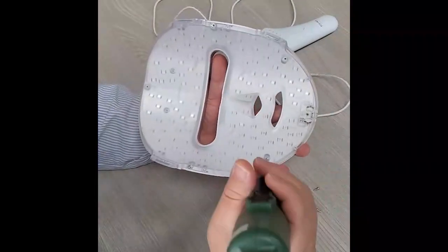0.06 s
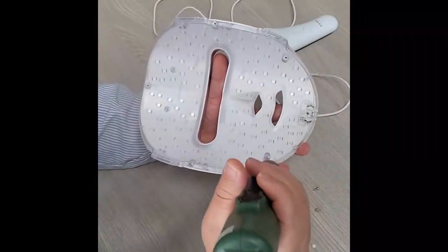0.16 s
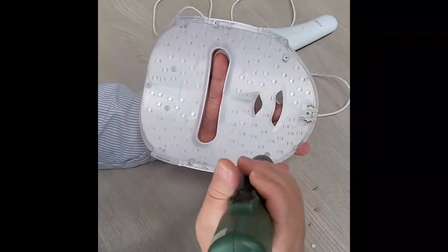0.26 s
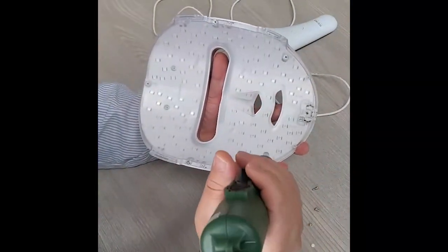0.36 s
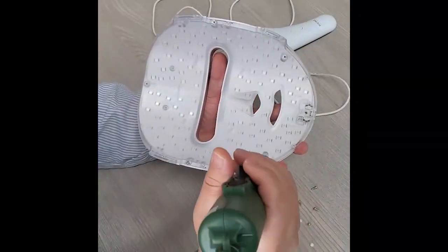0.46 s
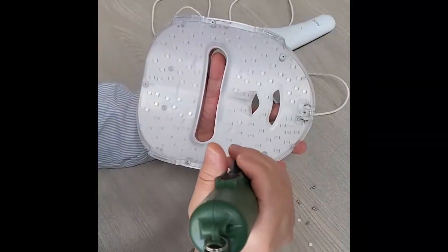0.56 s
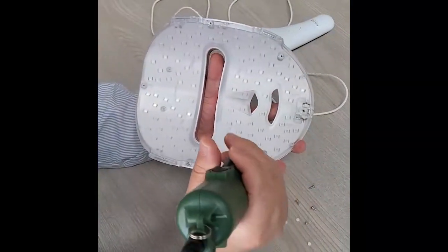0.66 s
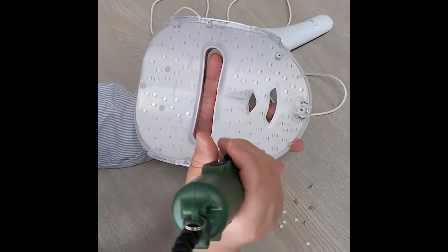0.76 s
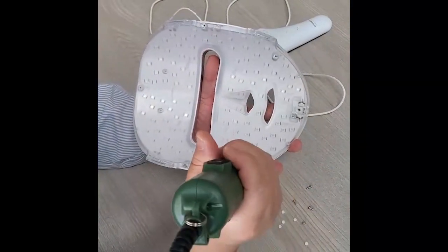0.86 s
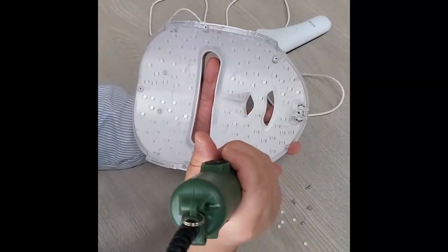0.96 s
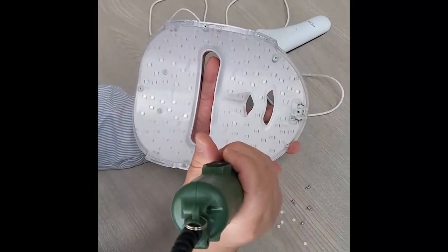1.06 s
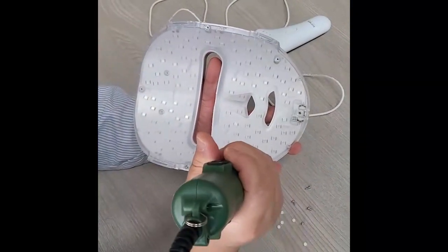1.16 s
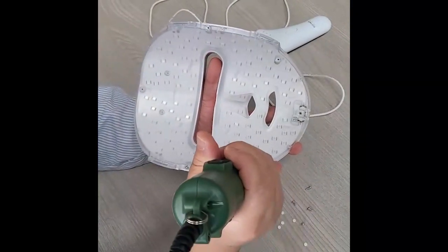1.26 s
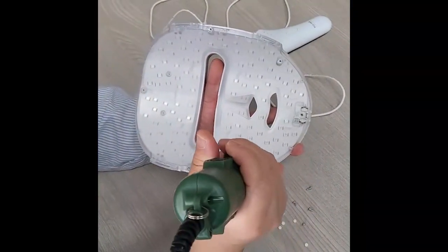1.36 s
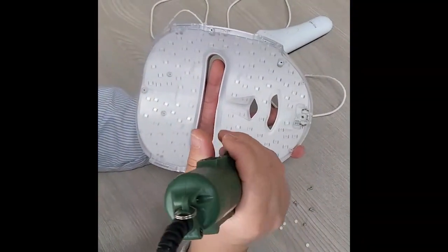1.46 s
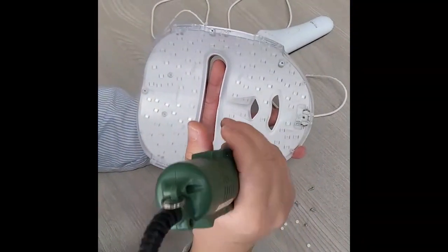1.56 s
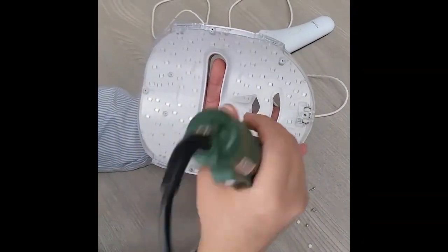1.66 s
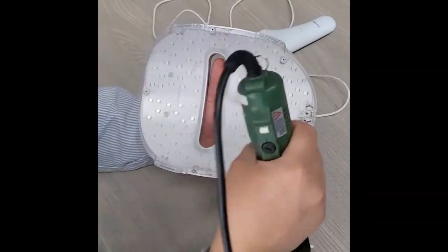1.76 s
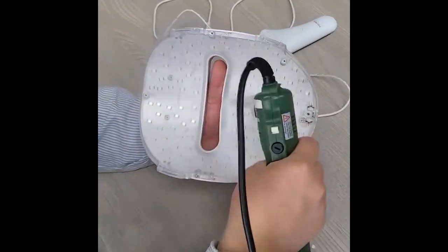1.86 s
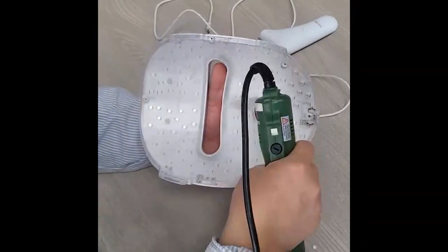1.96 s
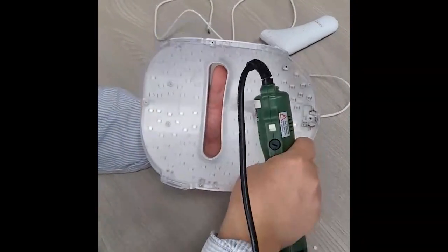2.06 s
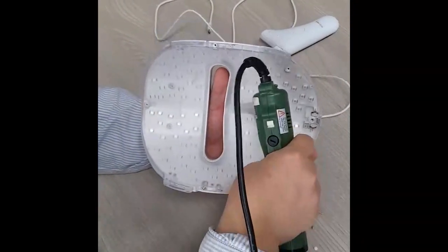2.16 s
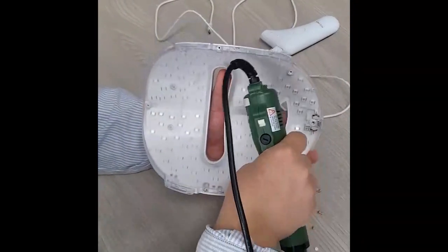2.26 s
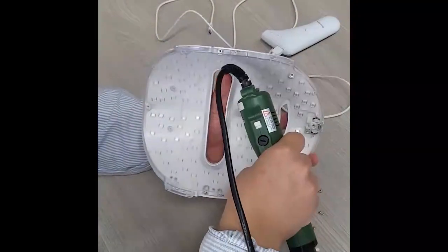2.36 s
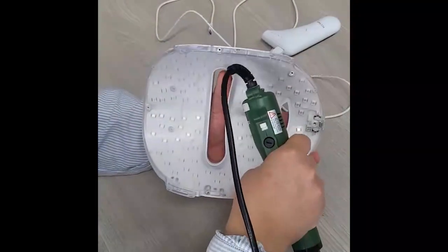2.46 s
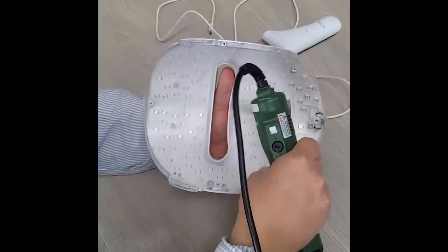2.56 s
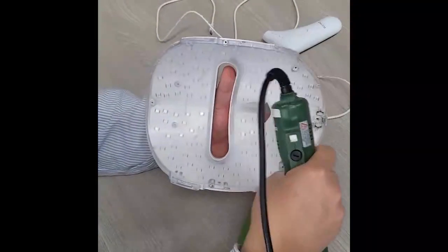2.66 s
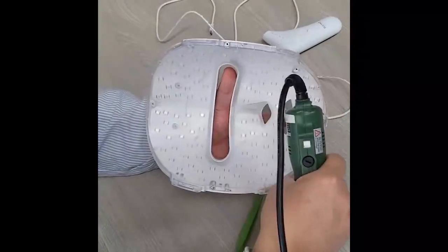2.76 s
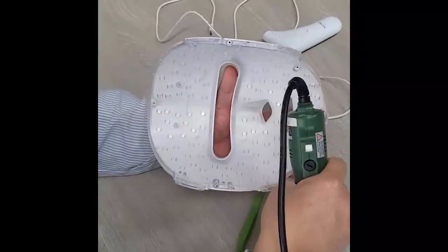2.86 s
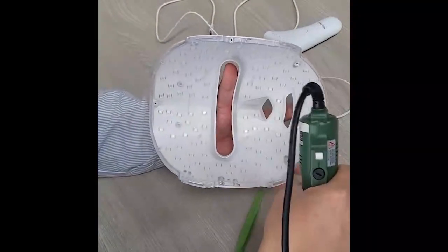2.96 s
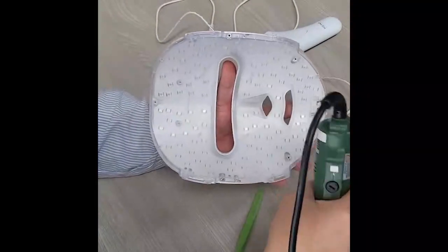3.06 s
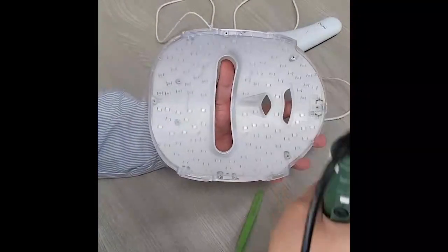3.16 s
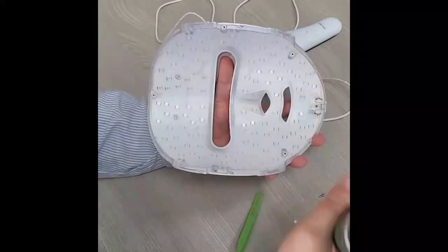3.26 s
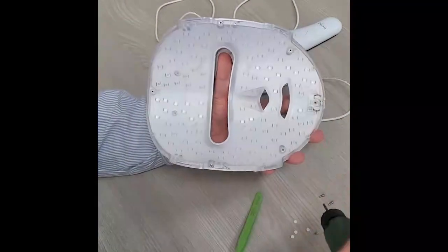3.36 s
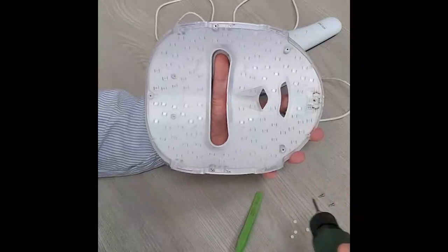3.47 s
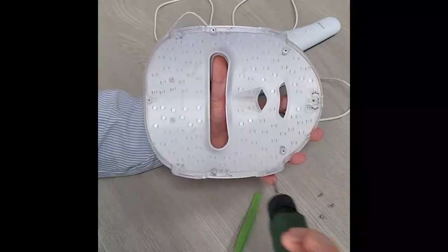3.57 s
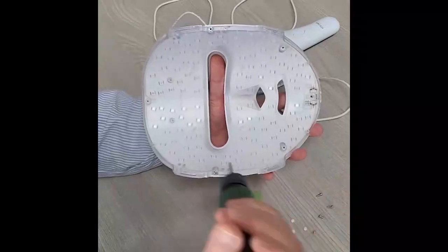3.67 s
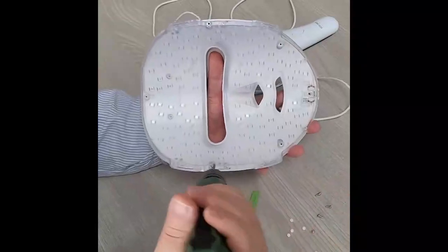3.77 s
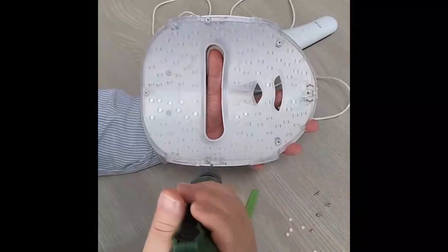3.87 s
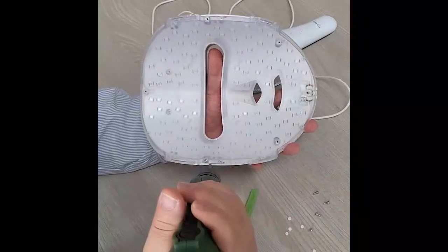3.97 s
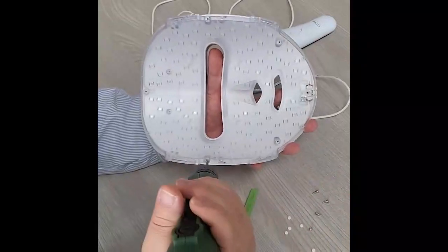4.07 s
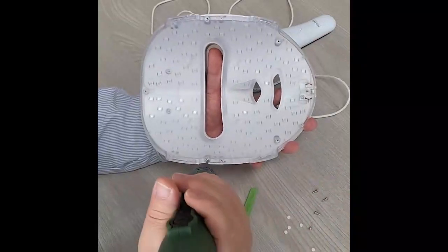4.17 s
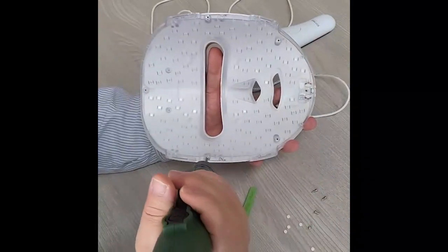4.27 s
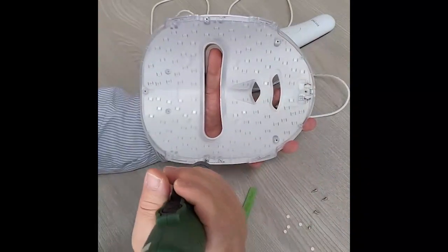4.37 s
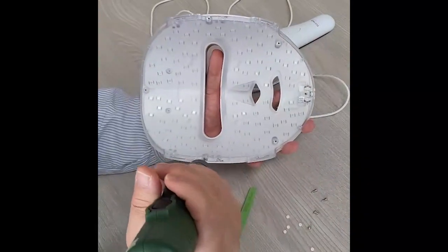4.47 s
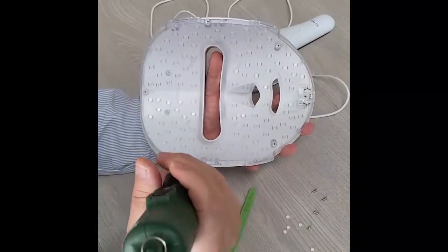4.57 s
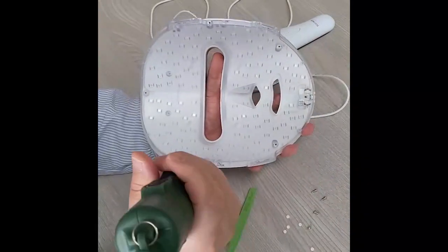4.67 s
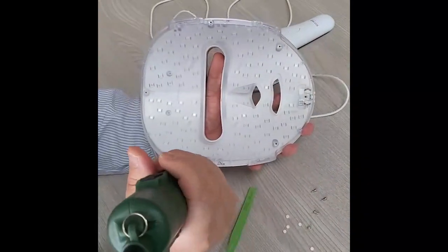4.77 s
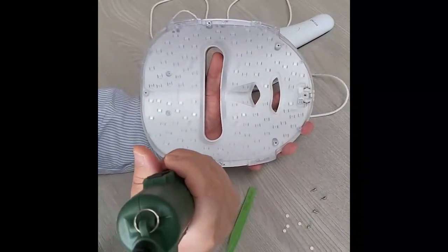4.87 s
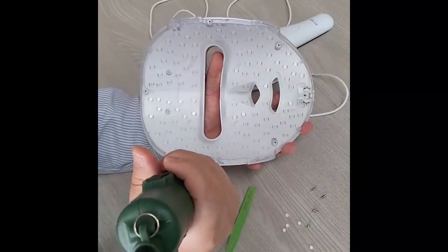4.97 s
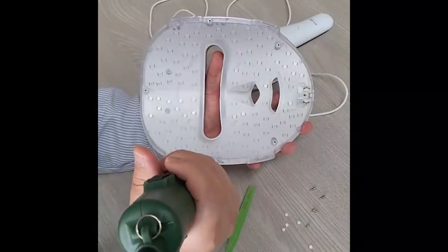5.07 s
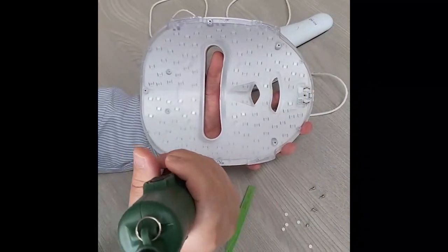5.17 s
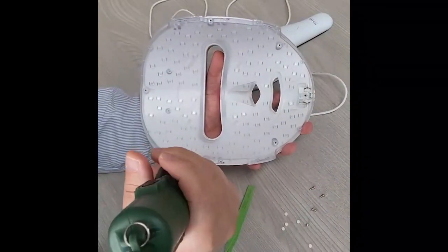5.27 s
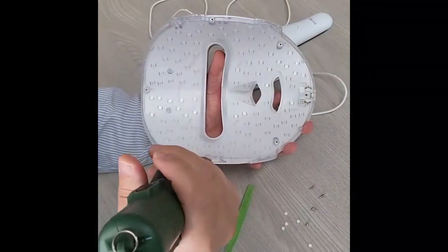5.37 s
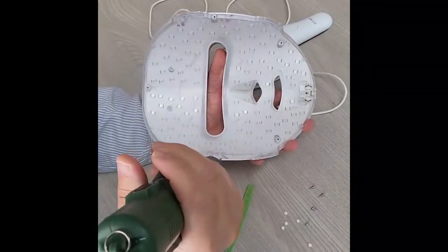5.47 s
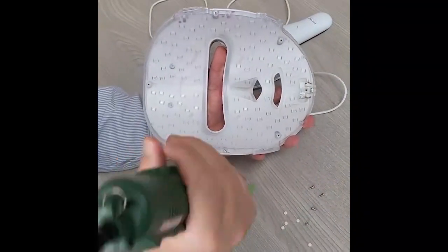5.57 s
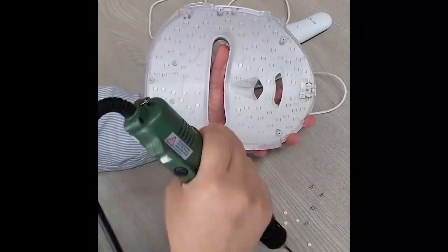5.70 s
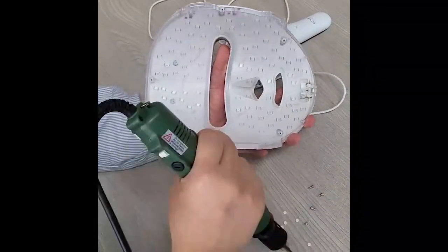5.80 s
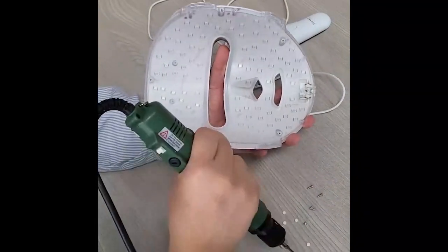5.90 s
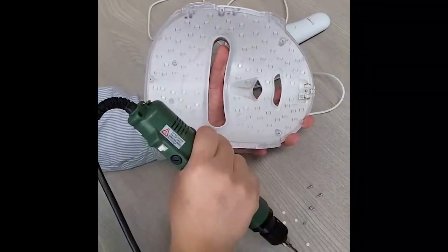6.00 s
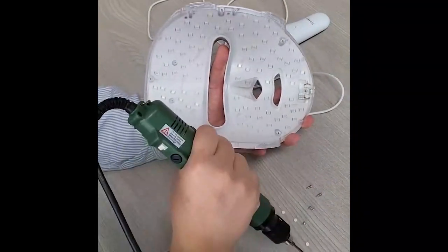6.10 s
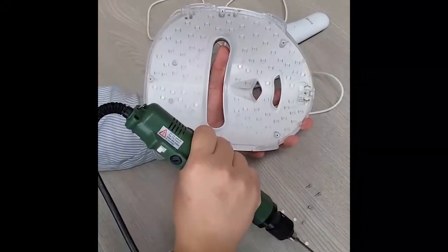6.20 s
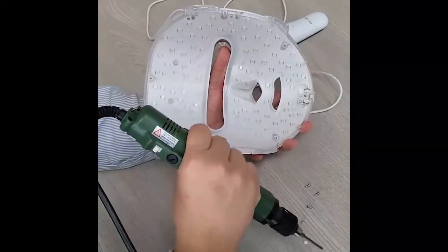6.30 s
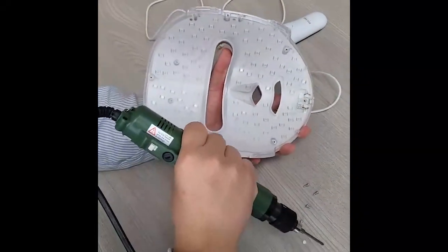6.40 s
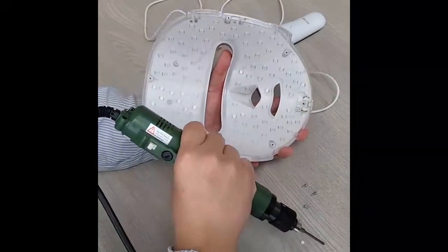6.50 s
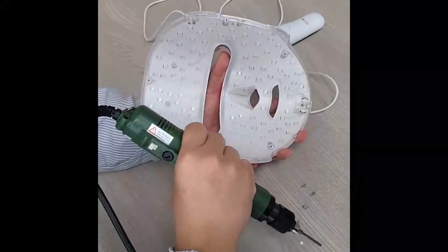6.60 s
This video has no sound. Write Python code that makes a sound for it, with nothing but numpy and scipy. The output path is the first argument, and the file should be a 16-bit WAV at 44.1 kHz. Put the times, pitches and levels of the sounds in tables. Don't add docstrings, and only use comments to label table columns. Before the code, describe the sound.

A stereo phone microphone sits near a table where a small corded power screwdriver works on thin plastic. Dry taps and a faint steely sizzle come first, then a sharp clutch knock and a gritty, buzzing whine with a falling spin-down. Rustles, dull bumps and tiny metallic ticks follow, then harder taps and a second run, before faint handling and room hum.

```python
import sys
import numpy as np
from scipy import signal
from scipy.fft import rfft, irfft, next_fast_len
from scipy.io import wavfile
from scipy.ndimage import uniform_filter1d

SR = 44100
rng = np.random.default_rng(int(sys.argv[2]) if len(sys.argv) > 2 else 0)


def store_wav(level_fs):
    pcm = np.round(np.clip(np.atleast_2d(level_fs), -1, 1) * 32767)
    wavfile.write(sys.argv[1], SR, pcm.T.astype(np.int16))


def convert_level_to_amplitude(level_db):
    exponent = np.asarray(level_db, float) / 20
    return 10 ** exponent


N = 292824


def unit(x):
    return x / np.sqrt(np.mean(x ** 2) + 1e-20)


def along(points, hz):
    f, v = np.transpose(points)
    return np.interp(np.log(hz + 1), np.log(f + 1), v)


def curves(tables):
    t = np.arange(N) / SR
    s, *cols = np.vstack(tables).T
    gate = sum((t >= rows[0][0]) & (t < rows[-1][0]) for rows in tables)
    return [np.interp(t, s, c) for c in cols] + [np.abs(uniform_filter1d(gate * 1., size=300))]


def wobble(rate):
    knots = int(N * rate / SR) + 2
    return np.interp(np.arange(N) * rate / SR, np.arange(knots), rng.standard_normal(knots))


def swells(rows):
    grid_s = np.arange(0, N / SR + .001, .001)
    gain = sum(convert_level_to_amplitude(db - 60 * np.maximum((s - grid_s) / rise, (grid_s - s) / fade))
               for s, db, rise, fade in rows)
    return np.interp(np.arange(N) / SR, grid_s, gain)


def filtered(x, response):
    m = next_fast_len(x.shape[-1] + 8192)
    return irfft(rfft(x, m) * response(np.fft.rfftfreq(m, 1 / SR)), m)[..., :x.shape[-1]]


def ringing(modes):
    return lambda f: sum((-1) ** k * convert_level_to_amplitude(db) * 1j * f * w / (c * c - f * f + 1j * f * w)
                         for k, (c, w, db) in enumerate(modes))


def rush(spectrum, alike, patchy_db=0):
    hz, _, z = signal.stft(rng.standard_normal((2, N)), SR, nperseg=512)
    field = uniform_filter1d(rng.standard_normal(z.shape[1:]), size=6, axis=0)
    field = uniform_filter1d(field, size=6, axis=1)
    colour = along([(0.97, -120)] + list(spectrum) + [(SR / 2, -120)], hz)[:, None]
    a, b = signal.istft(z * convert_level_to_amplitude(colour + patchy_db * unit(field)), SR, nperseg=512)[1][:, :N]
    turn = np.arccos(np.clip(alike, -1, 1)) / 2
    return unit(np.cos(turn) * a + np.sin(turn) * b * np.array([[1], [-1]]))


def room_tail(seconds):
    # f/Hz, t60/s
    decay = [(200, 0.13), (1000, 0.24), (4000, 0.25), (7500, 0.26), (12000, 0.093), (15000, .08),
             (15500, .02)]
    hz, t = np.fft.rfftfreq(256, 1 / SR), np.arange(0, seconds, 128 / SR)
    z = rng.standard_normal((2, 2, len(hz), len(t))) * (1 + .8 * convert_level_to_amplitude(-60 * t / .12))
    dying = convert_level_to_amplitude(-60 * t / along(decay, hz)[:, None])
    tail = signal.istft((z[0] + 1j * z[1]) * dying, SR, nperseg=256)[1]
    return np.pad(tail, ((0, 0), (150, 0))) / np.linalg.norm(tail[0])


def echoed(x):
    return unit(1.4 * x + signal.fftconvolve(x, room_tail(.1), axes=1)[:, :N])


def background():
    # t/s, level/dB
    hum_course = [(0.0, -62), (0.39, -56.5), (0.42, -63.5), (1.05, -58), (2.52, -64.5), (2.92, -55),
                  (3.68, -66), (4.86, -62.5), (4.97, -50.5), (5.03, -62.5), (5.21, -56.5), (5.25, -63.5),
                  (5.66, -59), (5.69, -65.5), (6.6, -64.5), (6.64, -71)]
    # f/Hz, width/Hz, level/dB
    hum_tones = [(37.3, 15, -15.5), (58.24, 2.8, 6), (117.4, 9.4, -10), (152, 29, -20)]
    # f/Hz, level/dB per Hz
    air_colour = [(100, -39), (170, -9.5), (230, 2.5), (284, -20.5), (364, -16), (440, -23), (596, -27),
                  (1570, -30.5), (3920, -34), (10700, -31.5), (12600, -35.5), (13100, -49.5), (16000, -65)]
    # strongest t/s, f/Hz, level/dB, rise/s, fade/s
    creaks = [(6.19, 1555, -80, .7, .6), (6.31, 1555, -81, .6, .8), (6.16, 1130, -77, .2, .5),
              (6.34, 1130, -81, .3, .25), (6.21, 2480, -75, .12, .2), (6.2, 2280, -78, .1, .2),
              (6.255, 2350, -81, .1, .2), (6.2, 1420, -79, .08, .1), (6.265, 1660, -82, .1, .15),
              (6.265, 1100, -75, .1, .25)]
    hum_db, _ = curves([hum_course])
    a, b = rng.standard_normal((2, N))
    hum = filtered(a + 0.18 * b * np.array([[1], [-1]]), lambda f: ringing(hum_tones)(f) * (f < 250))
    hum = unit(hum) * convert_level_to_amplitude(hum_db + 2.5)
    whistle = np.zeros(N)
    for s, hz, db, rise, fade in creaks:
        pitch = hz + 11 / rise * wobble(62)
        gain = swells([(s, db, rise, fade)]) * convert_level_to_amplitude(2.5 * wobble(36))
        whistle += gain * np.sin(2 * np.pi * np.cumsum(pitch) / SR)
    air = rush(air_colour, 0.25, patchy_db=3.5) * convert_level_to_amplitude(-74 + 1.4 * wobble(1.4))
    return hum * convert_level_to_amplitude([[-1.6], [1.6]]) + air + whistle


def handling():
    # t/s, fade/s, rub level/dB, table rumble/dB above it, hiss/dB above it
    jolts = [(0, .08, -43, -12.5, -7), (2.0, .15, -68, -23, 13), (.6, .25, -62, -20, -20),
             (2.71, 0.18, -49.5, -11, 2), (2.028, 0.46, -76, -13.5, 9), (2.873, 0.23, -35, -10, -6.5),
             (2.883, 0.44, -55.5, 27, -1), (2.93, 0.22, -66, 30, -16), (3.144, 0.12, -57.5, 7, 8),
             (3.011, 0.099, -72, 33, -18), (3.035, 0.36, -44.5, -6, -4.5), (3.09, 0.35, -53.5, -7, -27),
             (3.125, 0.09, -49.5, -19, -8), (3.222, 0.21, -60.5, 18.5, 7.5), (4.07, 0.2, -55, 4.5, -17)]
    # strongest t/s, then the same columns
    slides = [(2.251, 0.16, -84.5, 20, -1), (2.359, 0.25, -75.5, 18, -15), (2.46, 0.36, -81, 16, 2.5),
              (3.28, 0.38, -44.5, 6.5, -8), (3.331, 0.11, -47.5, -21, -34), (3.48, 0.6, -69.5, 1.5, -15),
              (3.6, 0.39, -58.5, -1.5, -17), (3.68, 0.19, -83, 13, -13), (3.79, 0.3, -90.5, 38, -9),
              (4.66, 0.32, -76, 10, -11.5), (4.755, 0.4, -70.5, -4.5, -23), (4.9, .12, -63.5, -6, -31.5),
              (0.175, 0.21, -38.5, -16, -18.5), (5.86, 0.17, -78.5, 13, 6.5),
              (5.93, 0.38, -67.5, 10.5, -13.5), (6.27, 0.38, -68, 9, -12), (6.62, .12, -89, 22.5, 0)]
    # f/Hz, width/Hz, level/dB
    table_modes = [(114.6, 22, 4.5), (155, 21, 2.5), (286, 100, -3.5), (443, 110, -8), (640, 120, -12)]
    # f/Hz, level/dB per Hz
    rub_colour = [(290, -39), (500, -9.5), (675, -5), (994, -10), (1290, 0), (1930, -2.5), (3300, -16),
                  (4290, -35.5), (7260, -120)]
    # f/Hz, level/dB per Hz
    hiss_colour = [(1760, -35), (3000, -3), (6440, -0.5), (10100, -12), (11100, -3.5), (13500, -14),
                   (15100, -16.5), (15500, -59.5)]
    # strongest t/s, level/dB, rise/s, fade/s
    scuffs = [
        (4.165, -49.5, 0.025, 0.18),
        (4.2, -48, 0.19, 0.31),
    ]
    # f/Hz, level/dB per Hz
    palm_colour = [(150, -40.5), (250, -11), (400, -2), (700, -2), (1150, -4), (1510, -20), (2290, -23),
                   (2800, -58), (3640, -81), (6160, -120)]
    # strongest t/s, level/dB, rise/s, fade/s
    buzzes = [(.2, -62, .03, .3), (.555, -64, .015, .3), (.6, -62, .03, .3), (.68, -62, .02, .35),
              (4.035, -62, .015, .35), (4.295, -64, .015, .4), (4.42, -57, .02, .35)]
    # f/Hz, level/dB per Hz
    sizzle_colour = [(3500, -40), (4600, -4), (5600, -2), (7000, 0), (7800, -4), (8400, -40)]
    jolt_rise_s, slide_rise = 0.033, 0.36
    strokes = [(jolt_rise_s, *row) for row in jolts] + [(slide_rise * row[1], *row) for row in slides]
    rubbing = swells([(s, db, rise, fade) for rise, s, fade, db, _, _ in strokes])
    shaking = swells([(s, db + low_db, rise, fade) for rise, s, fade, db, low_db, _ in strokes])
    hissing = swells([(s, db + top_db, rise, fade) for rise, s, fade, db, _, top_db in strokes])
    slips = wobble(27)
    top = rush([(60, -9), (100, 3.0), (600, -4.5)], 0.93, patchy_db=-1.0)
    top = filtered(top, ringing(table_modes))
    top = top / np.sqrt(np.abs(uniform_filter1d(np.mean(top ** 2, 0), size=2000)))
    rumble = shaking * convert_level_to_amplitude(-5.0 + 0.59 * wobble(30)) * top
    rub = rubbing * convert_level_to_amplitude(-1.5 + 3.5 * slips) * rush(rub_colour, 0.17, patchy_db=2.5)
    hiss = hissing * convert_level_to_amplitude(4.0 + 0.5 * slips) * rush(hiss_colour, 0.32, patchy_db=3.0)
    palm = swells(scuffs) * convert_level_to_amplitude(2.0) * rush(palm_colour, 0.85, patchy_db=2)
    sizzle = swells(buzzes) * rush(sizzle_colour, 0.4, patchy_db=3)
    return (rumble + rub + hiss + palm + sizzle) * convert_level_to_amplitude([[-1.2], [1.2]])


def taps():
    # t/s, peak level/dB, shell f/Hz, steel tick/dB above it, left-right/dB
    feeling = [(.153, -40, 1190, -20.5, 3), (0.1726, -25.5, 902, -18.5, 12), (.175, -32, 428, -31.5, -5),
               (0.1769, -17.5, 829, -19, -9.5), (.235, -34, 804, -45, 0.5), (.243, -35, 1500, -45, 0),
               (.255, -35, 840, -45, -2), (0.326, -50, 1630, -40, -1.5), (.545, -32, 1470, -17, -0.5),
               (0.582, -24, 1530, -33, -3), (.591, -29, 893, -45, 1), (.599, -32, 1900, -45, 0),
               (0.637, -36, 1394, -40, -1), (0.667, -29, 850, -17.5, -2), (0.772, -50.5, 974, -26, -2),
               (0.896, -72, 1205, 0, -7), (4.015, -27, 894, -38, -2), (4.026, -23.5, 780, -23, -5),
               (4.284, -23.5, 1144, -23, -1.5), (4.401, -40, 1510, -8, 2), (4.4042, -8.5, 1146, -26, -1),
               (4.456, -36, 922, -24, -4), (4.521, -43, 898, -23, -3.5), (4.748, -54, 1278, -23, -4.5),
               (4.768, -53.5, 1106, -13.5, -5), (4.883, -55.5, 1540, -14, -10)]
    clutch = [(0.979, -42, 1260, 4, -0.5), (0.985, -44, 1300, -3, -4), (1.0072, -29, 946, -8.5, -3),
              (1.0106, -8.5, 2310, -12.5, -7), (1.011, -9.5, 1243, -23, -7.5), (1.372, -23, 854, -13.5, 1),
              (1.432, -30, 1483, -3.5, 4.5), (4.907, -31, 3000, -5, 1), (4.922, -33, 3300, -6, -2),
              (4.9436, -4, 1030, -22.5, 3.5), (4.9458, -5, 2210, -25.5, -5.5), (4.9515, -8, 2310, -14, -4),
              (4.9516, -10, 1451, -14, -2), (5.349, -29, 648, -4, 4), (4.9445, -18, 570, -30.5, -2)]
    rattles = [(0.028, -38, 2600, -6.5, -3), (1.993, -38, 2600, -5, -9), (2.006, -50, 1700, -20, -8.5),
               (2.358, -57, 850, -40, -5), (2.697, -38, 1100, -30, -4.5), (2.696, -24.5, 2160, -8, -6),
               (2.72, -39, 1300, -14, -2.5), (2.856, -36, 2440, 10.5, -4), (2.874, -43, 1580, -17, -19),
               (3.021, -43, 2240, 15, -5), (3.123, -46, 1820, 9, -8.5), (3.148, -61, 1900, 8, -2),
               (3.215, -55, 1980, 12.5, -8.5), (3.571, -56, 1480, -8, -14), (5.919, -58.5, 650, -14, -6.5),
               (6.195, -58, 2444, -11, -6), (6.26, -65, 700, -19.5, -8.5)]
    # f/Hz, width/Hz, level/dB
    shell_modes = [(621, 53, -5.5), (900, 120, -6.5), (1160, 590, -4), (1630, 79, 1.5), (2250, 480, -0.5)]
    # f/Hz, width/Hz, level/dB
    steel_modes = [(3570, 460, -1), (4680, 1100, 4), (5270, 2600, -0.5), (6900, 1500, -1.5),
                   (10220, 2200, -5), (10600, 1500, -1)]
    # f/Hz, width/Hz, level/dB
    table_modes = [(310, 12, -5), (450, 190, 0)]
    medium_db = -29.5
    out, t = np.zeros((2, N + SR)), np.arange(SR // 16) / SR
    for s, db, spot_hz, tick_db, pan_db in feeling + clutch + rattles:
        thud_db = -15.5 - 0.31 * (db - medium_db) - 11 * np.log2(spot_hz / 1100)

        loose = convert_level_to_amplitude(0.22 * (medium_db - db))
        chatter_s = np.array([[0.0089 * (1 + loose)], [.009], [.012]])
        blow = 0.24 * loose * rng.standard_normal((3, len(t))) * convert_level_to_amplitude(-60 * t / chatter_s)
        blow[::2, 0] = 1
        blow[0, round(SR / spot_hz)] = 1.7

        far = [(hz, w, level + 4.5 - 8 * abs(np.log2(hz / spot_hz)))
               for hz, w, level in shell_modes if abs(hz - spot_hz) > spot_hz / 5]
        shell = ringing(sorted(far + [(spot_hz, 0.37 * spot_hz, 0)]))
        steel = ringing(steel_modes)
        bright = min((tick_db + 3.0) / 11, 1.15)

        def soft(f):
            return shell(f) / (1 + 1j * f / (2.6 * spot_hz)) ** 2

        def hard(f):
            return steel(f) * (1j * f / (2500 + 1j * f)) ** 2 * (1 + 1j * f / 5000) ** bright

        parts = [filtered(b, body) for b, body in zip(blow, (soft, hard, ringing(table_modes)))]
        peaks = convert_level_to_amplitude([db + 0.5, db + tick_db + 10.5, db + thud_db + 2.5])
        hit = sum(g * p / np.abs(p).max() for g, p in zip(peaks, parts))

        blurred = np.sqrt(np.abs(uniform_filter1d(np.abs(rfft(hit)) ** 2, size=30)))
        spread = np.roll(irfft(blurred), shift=64)[None, :512]
        wet = convert_level_to_amplitude(-5) * signal.fftconvolve(spread, room_tail(.3), axes=1)
        wet[:, :len(t)] += hit
        out[:, round((s + .0009) * SR):][:, :wet.shape[1]] += wet * convert_level_to_amplitude([[pan_db / 2], [-pan_db / 2]])
    return out[:, :N]


def rotor():
    # screw breaks loose t/s, trigger released t/s, free commutator f/Hz, speed-up/s, whine level/dB
    spins = [
        (1.035, 1.524, 5960, .04, -43),
        (4.96, 5.341, 5950, .04, -44.5),
    ]
    held_speed = .75
    coast_hz_per_s, stop_hz = 16700, 1230
    t, bar_hz, gain = np.arange(N) / SR, np.zeros(N), np.zeros(N)
    for loose_s, off_s, free_hz, settle_s, db in spins:
        since = np.clip(t - loose_s, 0, off_s - loose_s)
        driven = free_hz * (1 - (1 - held_speed) / (1 + since / settle_s))
        hz = driven - coast_hz_per_s * np.maximum(t - off_s, 0)
        on = (t > loose_s) & (hz > stop_hz - 330)
        hz = 120 * np.logaddexp(hz / 120, stop_hz / 120)
        bar_hz = bar_hz + on * hz
        gain = gain + on * convert_level_to_amplitude(db) * (np.abs(hz) / free_hz) ** .8
    return bar_hz, np.abs(uniform_filter1d(gain, size=300))


def commutator_whine(bar_hz, driven, phase, cupped):
    # multiple of the commutator rate, level/dB
    bar_tones = [(.49, -3), (1, 2.5), (1.084, -9), (2, -6), (3, -11)]
    # multiple of the commutator rate, level/dB over the whine
    mesh = [(.122, -13), (.244, -11), (.363, -10.5), (.182, -15), (.42, -14)]
    # f/Hz, level/dB
    housing = [(1100, -3), (1450, 3), (1750, -1), (2050, 6), (2350, -4), (2750, 3), (2950, -3), (3200, 4),
               (3800, 2), (4300, 1), (4800, 2), (5900, -1), (6150, -2), (6350, 8), (6650, 3), (7100, 6),
               (8500, -2), (12000, 0)]
    whine = np.zeros(N)
    for k, db in bar_tones:
        hz = k * bar_hz
        level_db = db + along(housing, hz) + (3.5 - 2 * driven) * wobble(60) - 1.5 * ~driven
        tone = convert_level_to_amplitude(level_db) * np.sin(k * phase) * (hz < 15300) * np.clip((hz - 950) / 300, 0, 1)
        if k == 1.084:
            tone = tone * driven
        if k < 1:
            tone = tone * np.clip((2250 - hz) / 500, .3, 1)
        whine += tone
    teeth = sum(convert_level_to_amplitude(db + 1.6 * wobble(22)) * np.sin(k * phase) for k, db in mesh)
    whine = whine + driven * convert_level_to_amplitude(6 * cupped) * teeth
    return whine * convert_level_to_amplitude([[4.5], [-7.5]])


def motor_noise(bar_hz, turn, load, cupped):
    # f/Hz, level/dB per Hz
    brush_colour = [(1530, -39), (2600, -10.5), (4260, -7.5), (4740, -6.5), (5270, -9), (5690, -7.5),
                    (7370, -4), (8320, -12.5), (10400, -6), (12200, -6), (14200, -7), (15050, -7),
                    (15300, -40), (16000, -70)]
    # f/Hz, level/dB per Hz
    gear_colour = [(590, -40.5), (1000, -4.5), (1350, 1), (1790, -6.5), (2090, 0), (2900, -11.5),
                   (3770, -36.5), (6380, -120)]
    # f/Hz, level/dB per Hz
    drone_colour = [(71, -38), (120, -4), (188, -14), (311, -4.5), (450, -9.5), (560, -12), (700, -6),
                    (950, -5), (1240, -29.5), (2090, -120)]
    # f/Hz, level/dB
    slowed = [(2600, 0), (3600, -4), (5000, -5), (6500, 0)]
    # f/Hz, level/dB
    cupped_colour = [(2300, 0), (3200, -2.5), (4200, -3.5), (5000, -1)]
    gear_db, drone_db = -14.5 + 11 * load, -32.5 + 35 * load
    drone_db = drone_db + np.clip(26 * (bar_hz - 5898) / 1000, -6.5, 0)
    noise = unit(turn * echoed(rush(brush_colour, 0.25, patchy_db=3)))
    noise = noise * convert_level_to_amplitude(.4 * wobble(11) + 1.6 * wobble(35))
    slow = np.clip((4200 - bar_hz) / 1500, 0, 1)
    noise = (1 - slow) * noise + slow * filtered(noise, lambda f: convert_level_to_amplitude(along(slowed, f)))
    noise = np.where(cupped, filtered(noise, lambda f: convert_level_to_amplitude(along(cupped_colour, f))), noise)
    noise = noise * convert_level_to_amplitude(0.5 * wobble(700) + 0.52)
    gears = echoed(rush(gear_colour, 0.077, patchy_db=2.0)) * convert_level_to_amplitude([[-.8], [.8]])
    drone = echoed(rush(drone_colour, 0.99, patchy_db=0.5)) * convert_level_to_amplitude([[-1.5], [1.5]])
    noise += convert_level_to_amplitude(gear_db + 1.0 * wobble(30)) * gears
    noise += convert_level_to_amplitude(drone_db + 1.7 * wobble(25)) * drone
    return noise


def motor():
    # t/s, brush level/dB, load on the bit 0-1
    run_a = [(.98, -49, 0.63), (1.01, -30, 0.65), (1.07, -31.5, 0.43), (1.17, -30.5, 0.27),
             (1.25, -33, 0.54), (1.53, -35.5, 0.61), (1.6, -38, 0.64), (1.65, -37, 0.12), (1.72, -37.5, 0),
             (1.79, -37.5, 0.01), (1.83, -50.5, 0.43), (1.87, -67.5, 0.98), (1.99, -78, 0.5)]
    run_b = [(4.907, -52, 0.47), (4.928, -44, 0.63), (4.942, -29.5, 1), (5.013, -29.5, 0.62),
             (5.08, -30.5, 0.52), (5.22, -32, 0.33), (5.29, -32, 0.57), (5.35, -32, 0.48),
             (5.43, -37.5, 0.8), (5.54, -36.5, 0.17), (5.61, -43, 0.22), (5.65, -56.5, 0.52),
             (5.75, -88, 1)]
    slips = [1.375, 1.435, 5.361]
    slip_load, slip_s = 0.25, 0.0092
    t = np.arange(N) / SR
    brush_db, load, on = curves([run_a, run_b])
    load = load + slip_load * sum(np.exp(-((t - s) / slip_s) ** 2) for s in slips)
    bar_hz, spinning = rotor()
    driven = np.gradient(bar_hz) > 0
    cupped = np.arange(N) >= 3.5 * SR
    rough_hz = bar_hz * (1 + .002 * wobble(120)) + 35 * ~driven * wobble(150)
    phase = 2 * np.pi * np.cumsum(rough_hz) / SR
    turn = 1 + .07 * np.sin(phase / 24)
    whine = commutator_whine(bar_hz, driven, phase, cupped)
    noise = motor_noise(bar_hz, turn, load, cupped)
    return on * convert_level_to_amplitude(brush_db + 2.0) * noise + spinning * turn * whine


def scene():
    lead_s = .00013
    sides = np.array([[1], [-1]])
    table = filtered(taps() + handling(), lambda f: np.exp(1j * np.pi * f * lead_s * sides))
    return motor() + table + background()


def low_pass(x):
    return signal.sosfilt(signal.butter(12, 16460, fs=SR, output="sos"), x)


def record(dry):
    mix = filtered(dry, lambda f: np.clip((16300 - f) / 900, 0, 1))
    return low_pass(mix)


dry = scene()
out = record(dry)
store_wav(out)
```